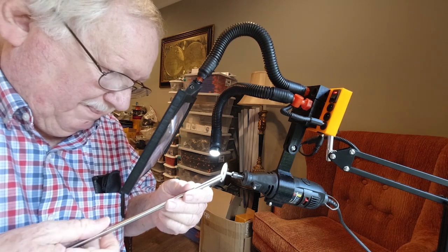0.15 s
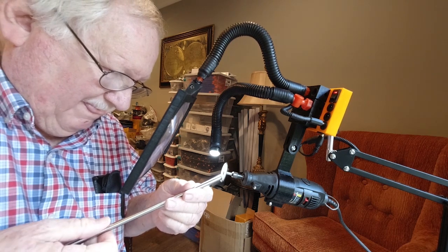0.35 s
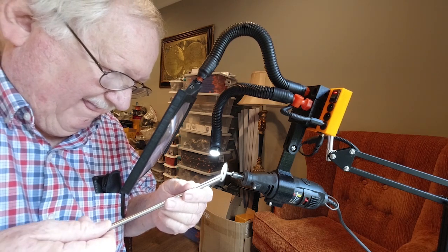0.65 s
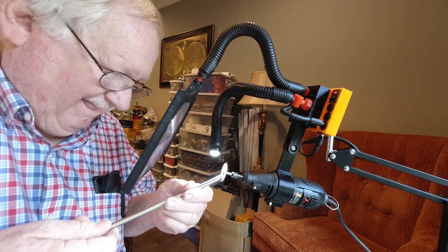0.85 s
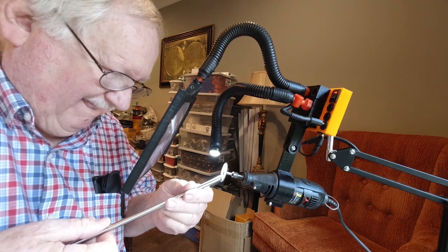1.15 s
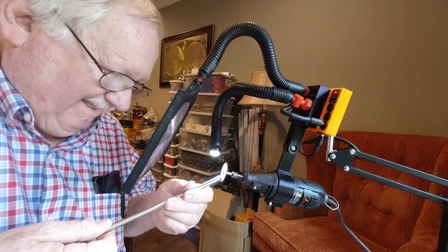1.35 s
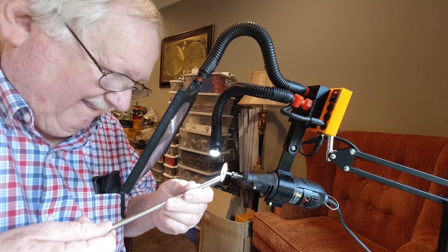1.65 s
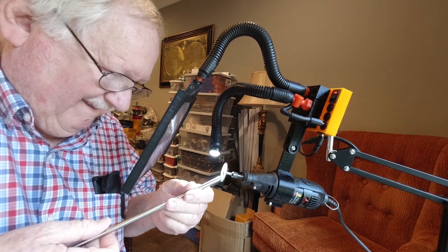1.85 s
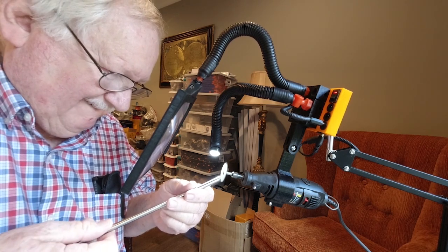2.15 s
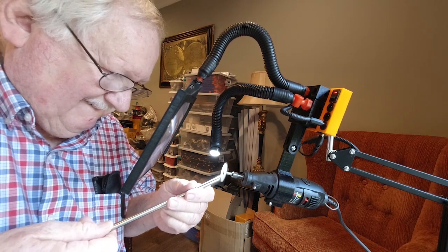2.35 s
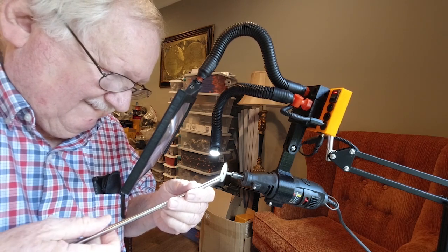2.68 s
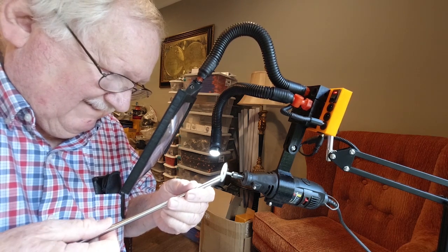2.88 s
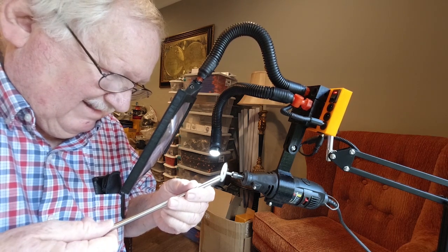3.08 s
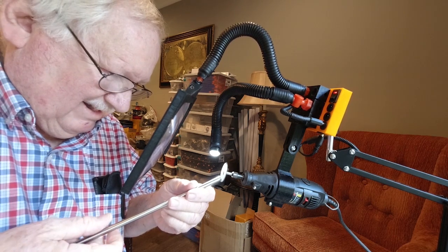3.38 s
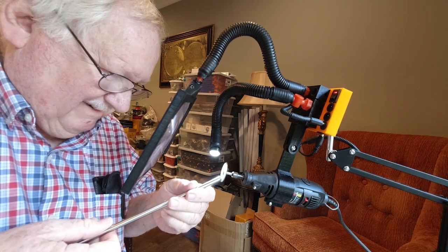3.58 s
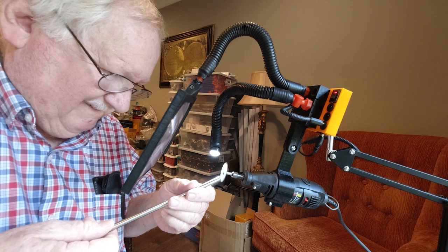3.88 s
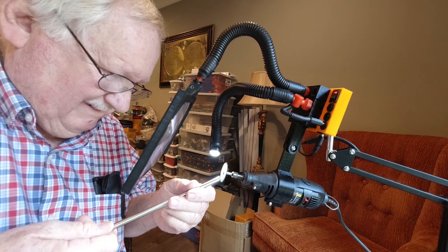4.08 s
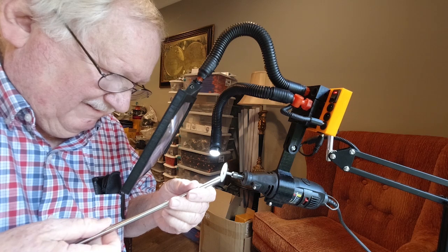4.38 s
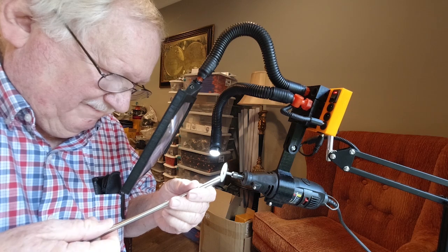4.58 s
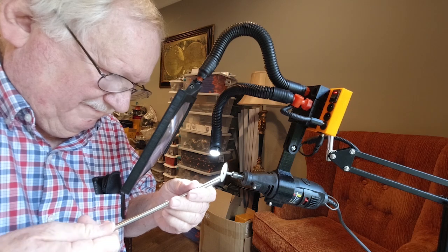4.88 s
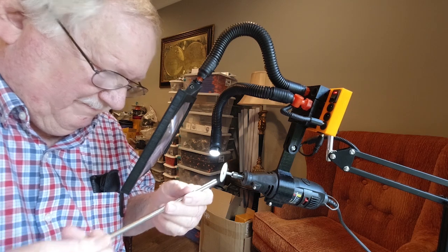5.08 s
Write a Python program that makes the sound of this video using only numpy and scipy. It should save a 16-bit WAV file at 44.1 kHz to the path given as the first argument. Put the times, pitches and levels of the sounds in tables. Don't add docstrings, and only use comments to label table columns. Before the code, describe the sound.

A small rotary tool runs for the whole 5.2 seconds: low mains-like hum, a buzzing mid and high whine that wavers slightly under load, and a soft broadband fan rush that fades a little. Over it a thin metal rod is pressed on a spinning abrasive wheel in overlapping, uneven pushes. From 0 to 1 s the scrapes are rather dull and gritty, with a quick lift at 0.3 s. From 1 to 2 s they become stronger, with a bright hard rasp near 1.5 s. Contact breaks briefly at 2.1 and 2.5 s, then sizzling pushes follow, with bright accents near 2.9 and 3.6 s and a hard bite at 3.5 s. After a longer lift at 4.0-4.2 s, preceded by a sharp loud scrape, grinding resumes, weakens with short hops near 4.9 s, and ends at about 5.1 s, leaving the motor. Close stereo, small room with short reflections.

```python
import sys
import numpy as np
from scipy import signal
from scipy.fft import rfft, irfft, next_fast_len
from scipy.io import wavfile
from scipy.ndimage import uniform_filter1d

SR = 44100
rng = np.random.default_rng(int(sys.argv[2]) if len(sys.argv) > 2 else 0)


def dump_mix(stems):
    frames = np.atleast_2d(stems).T
    limited = np.clip(frames, -1, 1)
    pcm = np.round(limited * 32767).astype(np.int16)
    wavfile.write(sys.argv[1], SR, pcm)


def natural_amplitude(level_db):
    exponent = np.asarray(level_db, float) / 20
    return 10 ** exponent


N = 230510
T = np.arange(N) / SR
HZ = np.fft.rfftfreq(N, 1 / SR)

# time_s, turns_per_second_hz
SHAFT_SPEED = [(0.0, 156.3), (0.22, 154.7), (0.42, 155.4), (0.65, 154.7), (0.85, 155.3), (1.08, 153.5),
               (1.3, 154.1), (1.5, 153.55), (2.0, 153.75), (2.25, 155.8), (2.55, 156.15), (2.8, 155.5),
               (3.3, 156.05), (3.6, 154.85), (4.2, 156.4), (4.5, 155.15), (4.9, 154.75), (5.23, 156.15)]


def unit(x):
    return x / np.sqrt(np.mean(x ** 2))


def curves(table):
    time_s, *columns = np.transpose(table)
    return [np.interp(T, time_s, column) for column in columns]


def colour(x, points):
    hz, db = np.transpose(points)
    gain_db = np.interp(np.log(HZ + 1), np.log(hz), db)
    return irfft(rfft(x) * natural_amplitude(gain_db), N)


def band(x, lo_hz, hi_hz):
    def below(hz):
        return 1 / (1 + (HZ / hz) ** 16)
    return irfft(rfft(x) * (below(hi_hz) - below(lo_hz)), N)


def ring(x, hz, width_hz):
    return signal.lfilter(*signal.iirpeak(hz, hz / width_hz, fs=SR), x)


def walk(rate_hz):
    hold = int(SR / rate_hz)
    held = np.repeat(rng.standard_normal(N // hold + 1), hold)
    slewed = uniform_filter1d(uniform_filter1d(held, hold), hold)
    return 1.3 * slewed[:N]


def steady(x):
    return x / np.sqrt(uniform_filter1d(x ** 2, 3000) + 1e-12)


def swells(table):
    centre_s, length_s, level_db = np.transpose(table)[:3, :, None]
    return natural_amplitude(level_db) ** 2 * np.exp(-(2 * (T - centre_s) / length_s) ** 2)


def stand(turns):
    # centre_s, length_s, level_db
    shudders = [
        (.19, 0.18, -60),
        (1.05, .12, -69),
        (3.5, 0.1, -69),
        (4.44, .15, -67),
    ]
    above_hz = curves(SHAFT_SPEED)[0] - 153.8
    half = np.sqrt(swells(shudders).sum(axis=0))
    first = natural_amplitude(-52.5 - 1.84 * above_hz)
    third = natural_amplitude(-53 - 5 * above_hz ** 2)
    shake = 0
    for order, gain in zip((.5, 1, 3), (half, first, third)):
        shake = shake + gain * np.sin(2 * np.pi * order * turns + np.array([[.08], [-.08]]))
    return np.sqrt(2) * shake


def motor(turns):
    # shaft_order, mains_ripple_order, level_db (rms)
    whine = [(0, 1, -58), (0, 2, -53.5), (0, 4, -64.5), (2, 0, -61.5), (5.03, 0, -63), (8, -2, -78.5),
             (6, 0, -70.5), (10, 0, -79), (8, -3, -62), (8, -1, -63.5), (8, 0, -61), (7.7, 2, -76.5),
             (8, 3, -66.5), (16, -4, -82), (16.2, -3, -100), (15.9, -2, -48.5), (16, -1, -48.5),
             (16, 0, -53.5), (15.9, 1, -51.5), (16, 2, -54.5), (15.9, 3, -69), (18, 0, -50), (22, 0, -58),
             (23, 0, -85), (24, 0, -66), (24, 1, -51), (24, -2, -71), (32, 0, -80), (40, 0, -61.5)]
    ripple_hz = 120
    out = 0
    for order, ripple, level_db in whine:
        cycles = round(order) * turns + round(ripple) * ripple_hz * T + rng.random()
        spread = rng.uniform(.3, .9) + .25 * walk(2)
        apart = .08 + min(order / 13, 1) ** 3 * spread
        waver_db = 1.9 * min(order / 9, 1) * walk(12) + 3.6 * (0 < order < 8) * walk(5.99)
        tone = np.sin(2 * np.pi * cycles + apart * np.array([[1], [-1]]))
        out = out + natural_amplitude(level_db + waver_db) * tone
    return np.sqrt(2) * out + stand(turns)


def air():
    # frequency_hz, level_db (per Hz)
    air_colour = [(25, -1.5), (60, -10), (150, -6.5), (350, -11.5), (510, -3), (650, -11.5), (850, 1),
                  (1040, -9), (1250, 1.5), (1800, -8), (2600, -0.5), (3700, -6), (5500, -4.5), (7800, -18),
                  (8600, -22)]
    rush = band(colour(rng.standard_normal(N), air_colour), 5, 8800)
    return natural_amplitude(-49 + 0.23 * walk(5.2)) * unit(rush)


def rumble():
    ports = [unit(band(rng.standard_normal(N), 15, 70)) for _ in range(2)]
    return natural_amplitude(-79) * np.array(ports)


def rim(turns, period, wear, spots=()):
    slots, count = 256, 830
    grains = rng.standard_normal((count, slots))
    grains = grains * natural_amplitude(3.5 * rng.exponential(size=(count, slots)))
    for k in range(period, count):
        grains[k] = np.sqrt(1 - wear) * grains[k - period] + np.sqrt(wear) * grains[k]
    for place, level_db in spots:
        drift = uniform_filter1d(rng.standard_normal(count), size=9)
        grains[:, int(place * slots) % slots] += natural_amplitude(level_db + 5 + 7 * drift)
    fine = signal.resample_poly(grains.ravel(), 4, 1)
    return unit(np.interp(turns * slots * 4, np.arange(len(fine)), fine))


def grit(turns):
    # time_s, likeness of one turn to the next (0-1)
    seating = [(0, .24), (.17, .06), (.55, .55), (.86, .68), (.95, .22), (1.06, .14), (1.22, .75),
               (1.76, .7), (1.95, .42), (2.8, .75), (3.36, .74), (3.5, .3), (3.65, .8), (4.0, .58),
               (4.35, .2), (4.58, .88), (4.95, .65), (5.1, .4)]
    # place (turns), level_db (over the grit)
    high_spots = [(0, 12.5), (.47, 13)]
    once = curves(seating)[0]
    twice = .25 + .55 * once
    lasting = np.clip((once - .1) / .78, 0, 1)
    bounce = np.clip((twice - .85 * once) / .7, 0, 1 - lasting)
    fresh = 1 - lasting - bounce + 1e-9
    chatter = signal.lfilter([1, -.7], 1, rim(turns, period=1, wear=1.))
    scrape = np.sqrt(lasting) * rim(turns, period=1, wear=.1, spots=high_spots)
    scrape += np.sqrt(bounce) * rim(turns, period=2, wear=.2)
    scrape += np.sqrt(fresh) * chatter
    warp = 0.47 * np.cos(4 * np.pi * turns)
    off_centre = 0.27 * np.cos(2 * np.pi * turns + 1)
    return scrape * (1 + warp + off_centre)


def contact_db():
    # leave_s, touch_s, landing_s (duration)
    lifts = [
        (.31, .385, .03),
        (2.05, 2.195, .014),
        (2.485, 2.54, .025),
        (4.0, 4.226, .014),
        (4.865, 4.928, .015),
        (4.965, 5.035, .015),
        (5.075, 5.4, .01),
    ]

    def away_db(s):
        return 296 * np.clip(s, 0, None) + 5 * np.clip(s / 0.014, 0, 1)
    return -sum(away_db(T - off) * np.clip((on - T) / land, 0, 1) for off, on, land in lifts)


def scrape_body(force):
    # frequency_hz, level_db (per Hz)
    scrape_colour = [(1100, -70), (1550, -4.5), (1740, -33), (1900, 0), (2500, 0), (2960, -10),
                     (3700, -7.5), (4800, -8), (5450, -6), (7500, -14), (10700, 2.5), (13100, 8.5),
                     (14100, -11), (15500, -17)]
    # frequency_hz, width_hz, level_db
    rod_modes = [(4690, 260, -10), (7590, 246, -6), (8506, 130, -14.5), (9290, 140, -12), (10700, 120, -18),
                 (10700, 230, 5), (11240, 57, -3.5), (11850, 120, 0.5), (12390, 70, 1.5), (13600, 23, 10.5),
                 (14830, 450, -4)]
    broad = colour(force, scrape_colour)
    patchy, modes = 0, 0
    for hz in 1250 * 2 ** np.arange(0, 3.7, 1 / 3):
        patchy = patchy + natural_amplitude(4.5 * walk(13)) * ring(broad, hz, hz / 3.5)
    for hz, width_hz, level_db in rod_modes:
        modes = modes + natural_amplitude(level_db) * ring(force * natural_amplitude(5.15 * walk(18)), hz, width_hz)
    return unit(patchy) + natural_amplitude(1) * unit(modes)


def bending(force):
    # frequency_hz, width_hz
    bend_modes = [(1890, 91), (3800, 1040), (4670, 610)]
    held_levels = (-53, -51, -66)
    # centre_s, length_s, level_db
    lower_rings = [(0.324, 0.35, -42.8), (0.448, 0.14, -37), (0.65, 0.057, -35.5), (0.9, 0.13, -34.5),
                   (1.1, 0.052, -32.5), (1.358, 0.098, -43.1), (1.584, 0.026, -36), (2.04, 0.72, -49),
                   (2.45, 0.22, -41.5), (2.64, 0.086, -37), (2.858, 0.035, -38.5), (3.077, 0.093, -49.5),
                   (3.396, 0.11, -38), (3.79, 0.13, -41.5), (4.072, 0.14, -35.5), (4.37, 0.31, -41),
                   (4.745, 0.22, -40.5)]
    # centre_s, length_s, level_db
    upper_rings = [(0.59, 0.22, -41), (0.843, 0.08, -30.5), (1.02, 0.6, -42), (1.304, 0.051, -39),
                   (1.46, 0.25, -34.5), (1.656, 0.08, -36), (1.887, 0.27, -35.9), (2.378, 0.43, -39.5),
                   (2.594, 0.1, -39.5), (2.84, 0.21, -39.5), (3.16, 0.13, -37.5), (3.48, 0.47, -40.5),
                   (3.982, 0.18, -37), (4.316, 0.42, -40.5)]
    # centre_s, length_s, level_db
    bites = [
        (0.122, 0.12, -44),
        (0.515, 0.056, -42),
        (0.926, 0.19, -43),
        (1.47, 0.045, -33),
        (2.624, 0.087, -33.5),
        (3.483, 0.1, -32),
        (4.41, 0.11, -45),
    ]
    out = 0
    for (hz, width_hz), rings, held_db in zip(bend_modes, (lower_rings, upper_rings, bites), held_levels):
        free = np.sqrt(swells(rings).sum(axis=0) + natural_amplitude(held_db) ** 2)
        mode = ring(ring(force, hz, width_hz), hz, width_hz)
        out = out + free * steady(mode)
    return out


def cutting(turns):
    # centre_s, length_s, level_db, dullness_db
    pushes = [(0.01, 0.048, -30, 8.5), (0.161, 0.22, -26.5, 7.5), (0.353, 0.047, -27.8, -2),
              (0.41, 0.1, -31, -1), (0.502, 0.1, -28.5, 10), (0.59, 0.2, -26, 5.5), (0.816, 0.096, -26, 2),
              (0.942, 0.15, -26.5, 8.5), (1.05, 0.14, -23, 1), (1.293, 0.035, -33, 1),
              (1.324, 0.19, -23.5, 2), (1.46, 0.086, -19, -6.5), (1.473, 0.21, -28.5, 12),
              (1.601, 0.09, -20.5, -3), (1.755, 0.16, -25, 1.5), (1.874, 0.18, -23.5, 1.5),
              (2.108, 0.13, -23, 1.5), (2.259, 0.048, -20, -9.5), (2.355, 0.48, -26, -2),
              (2.657, 0.17, -21.5, 0.6), (2.758, 0.11, -23, -3.5), (2.882, 0.068, -18.5, -7),
              (3.106, 0.28, -24.5, 0.6), (3.448, 0.22, -21, -1.7), (3.645, 0.09, -20.5, -7.5),
              (3.923, 0.31, -25, -0.9), (4.037, 0.11, -17, -8), (4.327, 0.32, -22.5, 0.5),
              (4.666, 0.22, -23, -5), (4.86, 0.32, -28.0, -6)]
    band_edges = (1400, 4300, 6900, 9500, 16500)
    # level_db (over the top hiss), slope (dB per dB of dullness)
    dulling = [(-14.5, 0.89), (-14, 0.9), (-7.5, 0.765), (-0.5, 0)]
    push = swells(pushes)
    effort = push.sum(axis=0) + natural_amplitude(-47) ** 2
    dull_db = np.transpose(pushes)[3] @ push / effort
    force = grit(turns)
    body = scrape_body(force)
    out = bending(force)
    for lo_hz, hi_hz, (level_db, slope) in zip(band_edges, band_edges[1:], dulling):
        gain = natural_amplitude(level_db + slope * dull_db) * np.sqrt(effort)
        out = out + gain * steady(band(body, lo_hz, hi_hz))
    return out * natural_amplitude(contact_db() - 5)


def room(x):
    t60_s, wet_db, port_lag_s, wide_hz = 0.091, 4, .00001, 1440
    s = T[:SR // 3]
    tails = rng.standard_normal((2, 2, len(s))) * natural_amplitude(-60 * s / t60_s) * (s > .001)
    tails = tails * natural_amplitude(wet_db) / np.sqrt(np.sum(tails ** 2, axis=2, keepdims=True))
    size = next_fast_len(N + SR // 3)
    posture = 0.85 * walk(1.483)
    poses = rfft(x * np.array([np.cos(posture), np.sin(posture)]), size)
    wet = irfft(np.sum(poses[:, None] * rfft(tails, size), axis=0), size)[:, :N]
    wide = 1 / (1 + (wide_hz / (HZ + 1)) ** 6)
    lag = np.exp(1j * np.pi * HZ * port_lag_s * wide * np.array([[1], [-1]]))
    return irfft(rfft(x) * lag + rfft(wet) * (wide + 0.24), N)


def scene():
    # time_s, level_db
    hand_fade = [(0, 2.5), (1.5, 1), (2.5, 0), (5.23, -2)]
    turns = np.cumsum(curves(SHAFT_SPEED)[0]) / SR
    fade = natural_amplitude(curves(hand_fade)[0])
    in_room = room(natural_amplitude(-2.0) * cutting(turns) + fade * air())
    return in_room + fade * motor(turns) + rumble()


def band_limit(x):
    return signal.sosfilt(signal.butter(12, 16330, fs=SR, output="sos"), x)


def record(dry):
    top_cut = signal.ellip(8, .2, 60, 15900, fs=SR, output="sos")
    mix = signal.sosfilt(top_cut, dry)
    return band_limit(mix)


dry = scene()
out = record(dry)
dump_mix(out)
```